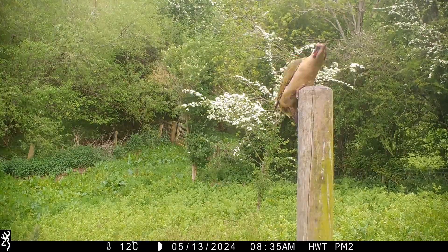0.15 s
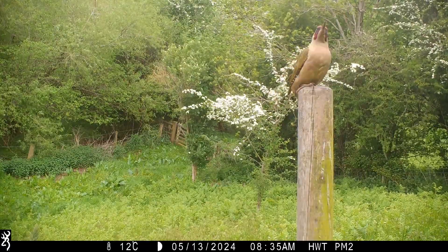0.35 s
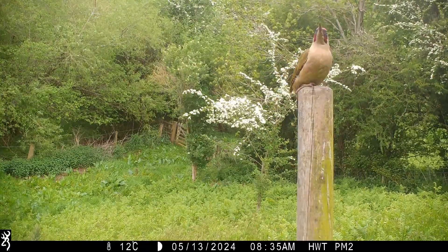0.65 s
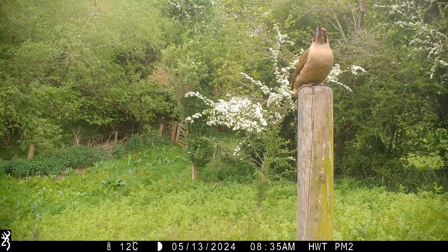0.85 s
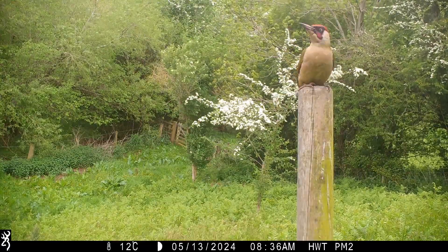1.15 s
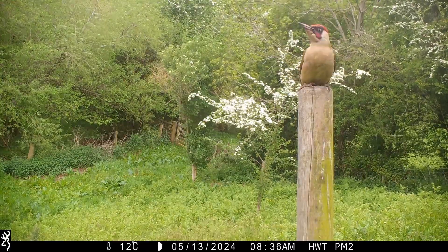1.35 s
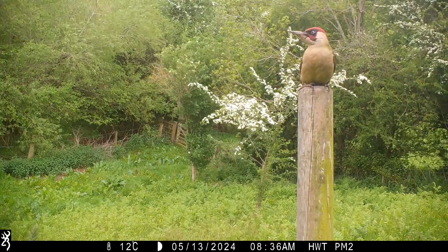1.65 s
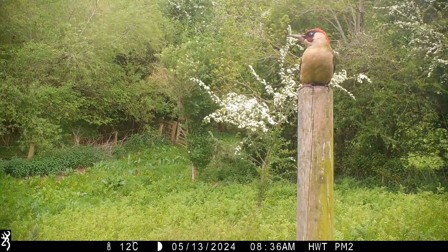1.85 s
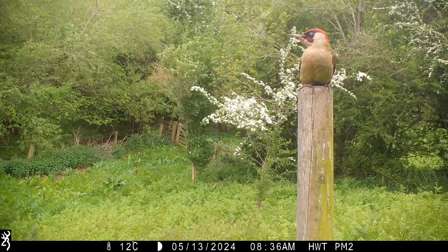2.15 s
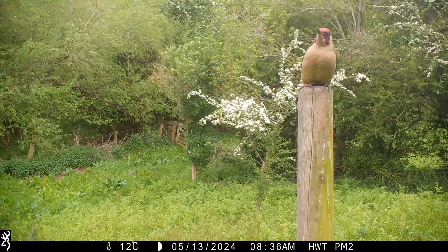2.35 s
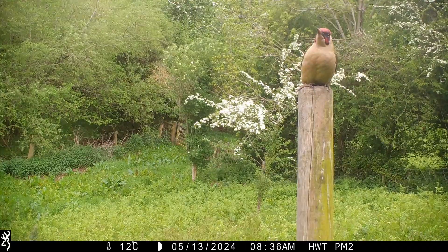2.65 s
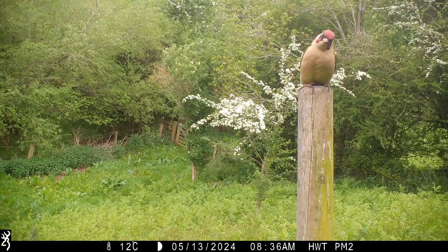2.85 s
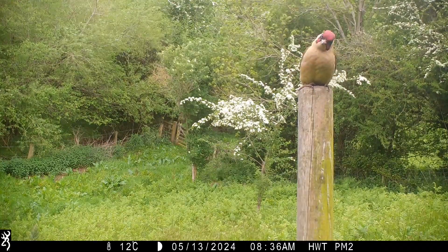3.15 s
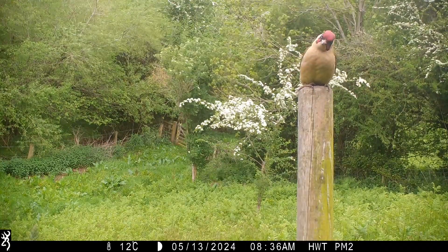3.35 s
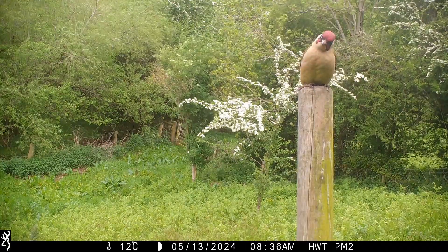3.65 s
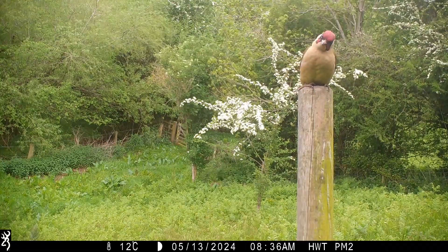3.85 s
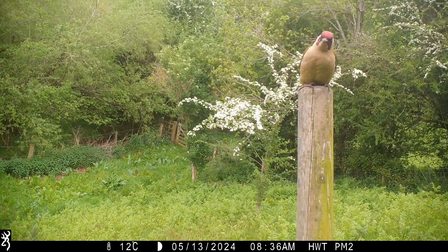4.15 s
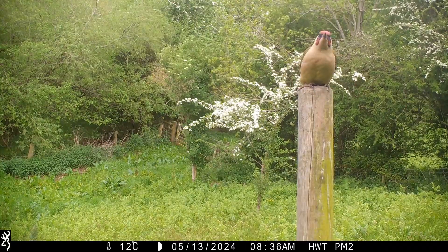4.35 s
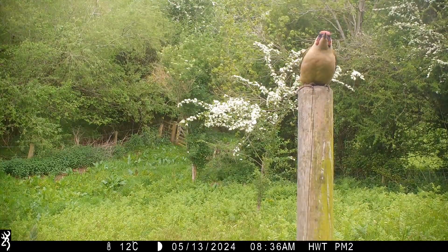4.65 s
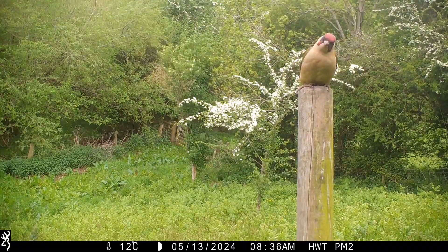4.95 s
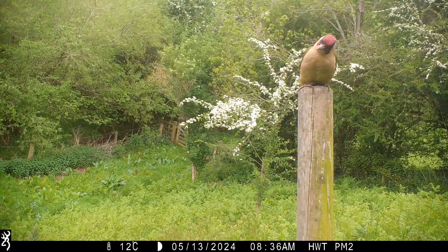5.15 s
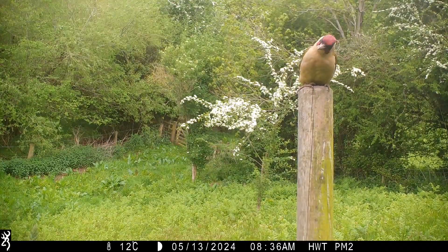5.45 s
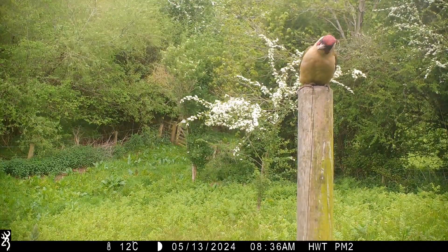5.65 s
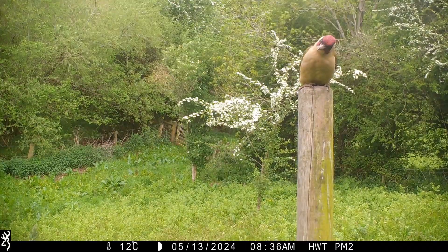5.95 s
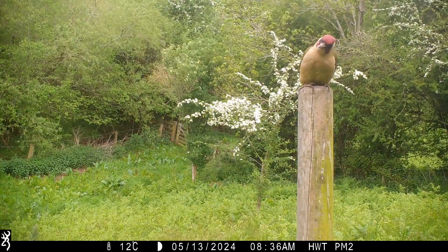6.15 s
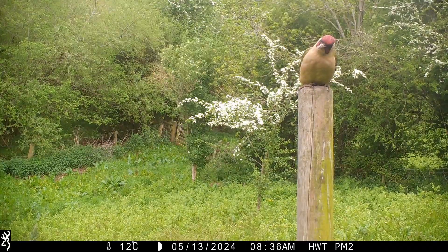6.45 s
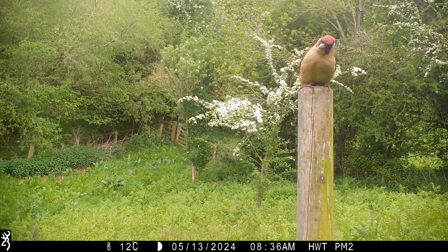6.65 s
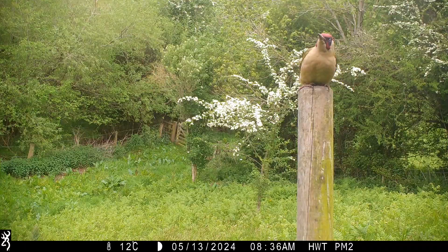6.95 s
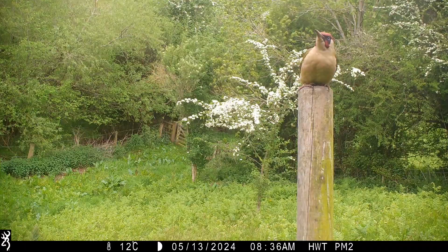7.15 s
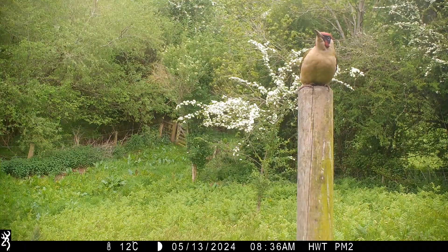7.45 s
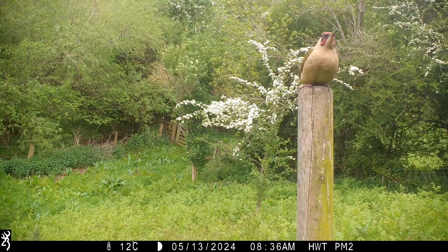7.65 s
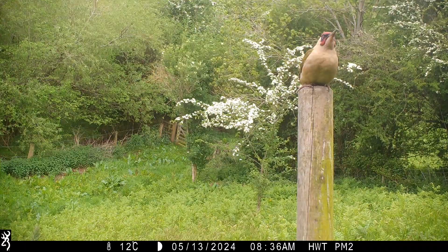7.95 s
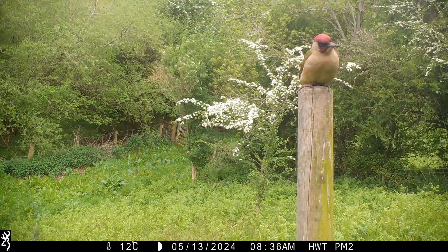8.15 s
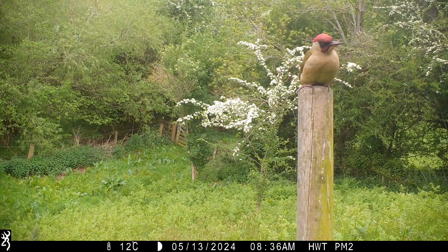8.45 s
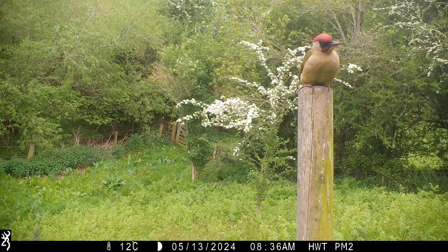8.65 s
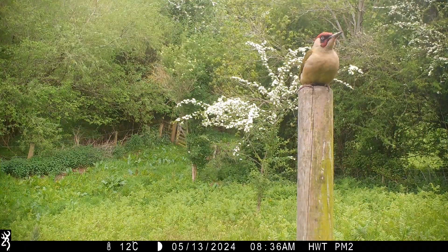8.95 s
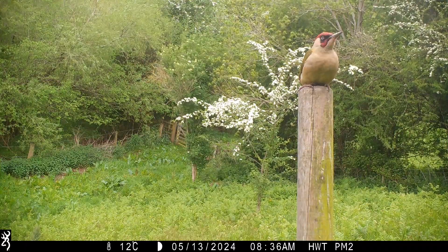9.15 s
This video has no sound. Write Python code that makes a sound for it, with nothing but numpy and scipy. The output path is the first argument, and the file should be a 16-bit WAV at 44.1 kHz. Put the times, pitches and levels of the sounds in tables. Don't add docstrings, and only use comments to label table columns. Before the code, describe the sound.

Over soft distant road hiss, a green woodpecker yelps three loud falling notes close by, then a thrush whistles and trills among faint far birds.

```python
import sys
import numpy as np
from scipy import signal
from scipy.fft import rfft, irfft
from scipy.io import wavfile
from scipy.ndimage import uniform_filter1d, minimum_filter1d

SR = 44100
rng = np.random.default_rng(int(sys.argv[2]) if len(sys.argv) > 2 else 0)


def nominal_scale(level):
    x = np.asarray(level, float) / 20
    return 10 ** x


def wav_record(signal):
    frames = np.transpose(np.atleast_2d(signal))
    bounded = np.clip(frames, -1, 1)
    quanta = np.round(bounded * 32767).astype(np.int16)
    wavfile.write(sys.argv[1], SR, quanta)


N = 410130

# (pitch [Hz], level [dB per Hz])
HISS_COLOUR = [(15, -56.5), (25, -23), (38, -11.5), (110, -12), (313, -5), (349, -3.5), (456, -3.5),
               (740, -1), (1020, -1.5), (1530, -4), (2690, -9.5), (6360, -39), (7890, -41.5), (8550, -44.5),
               (15400, -48)]
# (time [s], level [dB])
HISS_LEVEL = [(0.0, -53.5), (1.5, -53), (2.3, -54), (3.05, -54), (4.2, -54), (9.3, -54.5)]
HUM_HZ, HUM_DB = 50, -79
WHINE_HZ, WHINE_DB, FLIPS_PER_S = 7797.5, -80, 59.3
WHINE_SLIPS = [2.551, 3.12, 3.74, 7.09, 7.761, 8.155]

# (time [s], length [s], start [Hz],
# end [Hz], level [dB])
CHIRPS = [(0.755, 0.06, 2814, 2500, -63), (0.787, 0.094, 4980, 4810, -67), (1.927, 0.094, 5795, 5900, -80),
          (2.07, 0.04, 3882, 3450, -60.5), (2.12, 0.038, 3000, 2980, -55.5),
          (3.003, 0.032, 5080, 4480, -62.5), (3.03, 0.08, 4500, 4020, -60), (3.645, 0.04, 5133, 5562, -73),
          (3.795, 0.06, 3695, 4110, -75), (4.025, 0.11, 6108, 4851, -74.5),
          (7.305, 0.067, 5180, 5520, -84.5), (7.95, 0.08, 3989, 4780, -70.5),
          (8.075, 0.024, 4710, 4650, -77.5), (8.822, 0.03, 5992, 5311, -83.5),
          (8.88, 0.038, 5110, 5430, -78), (8.933, 0.06, 4821, 4560, -74), (9.04, 0.04, 4248, 4080, -72),
          (9.135, 0.04, 3278, 2710, -66), (9.145, 0.19, 4284, 3969, -74.5),
          (0.448, 0.45, 1390, 1310, -62.5), (0.799, 0.23, 1910, 2030, -60.5), (2.96, .115, 1297, 1372, -58),
          (3.065, .3, 1372, 1292, -58),
          (.37, 0.064, 3260, 3270, -69), (1.843, .04, 3560, 3580, -65), (1.919, 0.037, 4170, 3300, -61),
           (1.985, 0.017, 3893, 4600, -61), (2.09, .05, 3470, 3430, -63), (2.229, .03, 4600, 3850, -63),
           (2.32, .07, 4450, 4100, -67.5), (2.282, .08, 2920, 2640, -68.5), (2.4, 0.062, 4200, 4200, -71),
           (2.455, 0.035, 2600, 3950, -66), (2.495, .04, 3950, 2420, -65), (2.486, .07, 4280, 4100, -66),
           (2.727, 0.038, 3010, 3000, -69), (6.78, 0.079, 5150, 5020, -81), (7.452, .04, 1770, 1670, -60),
           (9.201, 0.065, 2950, 3240, -69)]
# (time [s], length [s], level [dB])
COOS = [
    (0.142, 0.2, -62.5),
    (0.612, 0.28, -63),
    (1.85, 0.2, -59.5),
    (2.599, 0.15, -59.5),
]
# (start [Hz], middle [Hz], end [Hz])
COO_PITCH = (400, 428, 405)
# (time [s], level [dB])
RUN = [(4.188, -63), (4.283, -62.5), (4.373, -65), (4.463, -67), (4.553, -67), (4.648, -65), (4.743, -61.5),
       (4.838, -65)]
# (length [s], start [Hz], middle [Hz], end [Hz])
RUN_NOTE = (0.032, 5250, 4450, 4340)
# (time [s], level [dB])
STROKES = [(2.116, -61), (2.248, -63), (2.368, -62), (2.5, -64), (2.628, -67)]
# (length [s], start [Hz], middle [Hz], end [Hz])
STROKE_NOTE = (.05, 5500, 4350, 3200)
BEND = .55
HIGH_LOSS_DB_PER_KHZ = 8.5

# (time [s], peak level [dB], pitch [Hz])
TICKS = [
    (.213, -42, 2500),
    (.319, -43, 4000),
    (1.096, -28, 1850),
    (1.267, -21, 1900),
    (1.466, -24, 1915),
]

# (time [s], pitch [Hz], level [dB])
SLUR = [(4.17, 3005, -61), (4.2, 2458, -47), (4.215, 2060, -59), (4.29, 2103, -58.5), (4.34, 2550, -45),
        (4.38, 2796, -38.5), (4.392, 2735, -68)]
# (time [s], length [s], start [Hz], end [Hz], level [dB])
ASIDES = [(4.295, .055, 3050, 3700, -55), (5.03, 0.043, 3500, 4250, -65.5), (4.455, .024, 2800, 2430, -45),
          (4.46, 0.022, 3700, 3000, -46), (7.255, .03, 2880, 3100, -53.5), (4.716, .036, 2052, 2757, -44.5),
          (4.754, .024, 2370, 2600, -42), (7.42, .058, 3180, 4240, -61.5)]
# (share of length [0-1], pitch [Hz], level [dB])
CHIP_SHAPE = [(0, 2040, -4), (.3, 2556, -7.5), (.5, 2650, 2.5), (.72, 2370, -3.5), (1, 2260, 0)]
# (share of length [0-1], pitch [Hz], level [dB])
PIPE_SHAPE = [(0, 2130, -13), (.1, 2650, -7), (.17, 3030, -0.5), (.42, 3140, -3), (.66, 3097, 2),
              (.75, 2540, -2.5), (.86, 2390, 0.5), (1, 2400, -16)]
# (time [s], length [s], level [dB])
CHIPS = [
    (5.208, .058, -43),
    (5.775, .052, -43),
]
# (time [s], length [s], level [dB])
PIPES = [
    (4.84, 0.16, -44.5),
    (5.343, .15, -41.5),
    (5.905, .15, -44),
]
# (time [s], length [s], level [dB], start [Hz], drop time [s])
DRAWLS = [
    (6.412, 0.2, -46, 2995, .05),
    (7.285, .18, -49.5, 3300, .022),
]
DRAWL_HZ, DRAWL_SAG_HZ = 2650, 69.5
DRAWL_SWELL = 0.51
DRAWL_SWING_HZ, DRAWL_PER_S = 60, 40
# (time [s], length [s], level [dB], swing [Hz], swings [per s])
TRILLS = [
    (6.706, 0.15, -45, 211, 38),
    (7.525, .16, -45.5, 190, 39.5),
]
# (time after start [s], pitch [Hz], level [dB])
FLICK = [
    (0, 2812, -16),
    (.019, 3230, -0.5),
    (.036, 2745, -3.5),
    (.09, 2627, 0.5),
]
TRILL_END_HZ, TRILL_END_DB, TRILL_END_SWING = 2610, -7, .3
TRILL_TAIL_S, TRILL_TAIL_DB, TRILL_DROP_DB = .1, -21, -14.5
OVERTONE_SLOPE, OVERTONE_HZ, OVERTONE_DB = 1.6, 2040, -42.5

# (time [s], pitch [Hz], effort [dB])
YELPS = [
    [(1.094, 770, -49.5), (1.101, 880, -17.5), (1.113, 1363, -4.5), (1.126, 1490, -3), (1.142, 1382, -6.5),
     (1.168, 1210, -6), (1.182, 1041, -13.5), (1.198, 1000, -17), (1.209, 778, -46)],
    [(1.273, 1182, -43.5), (1.28, 1306, -1), (1.293, 1493, -4.5), (1.305, 1420, -3), (1.311, 1352, -8),
     (1.337, 1170, -6.5), (1.353, 1013, -16), (1.370, 830, -20.5), (1.382, 676, -49.5)],
    [(1.465, 933, -50.5), (1.475, 1090, -21), (1.481, 1330, -4.5), (1.492, 1485, -3), (1.504, 1426, -4.5),
     (1.510, 1325, -8), (1.532, 1128, -9), (1.555, 988, -19), (1.572, 683, -41.5)],
]
# (time [s], length [s], rasp level [dB])
CATCHES = [(1.116, .008, -12.5), (1.179, .018, -14.5), (1.209, .01, -21.5), (1.28, .006, -6.5),
           (1.356, .018, -23), (1.363, .01, -26), (1.484, .007, -11), (1.547, .02, -13), (1.564, .01, -33)]
# (pitch [Hz], level [dB])
THROAT = [(900, -17), (1450, -8), (2350, 0.5), (2720, -4.5), (2950, 1), (4150, -25), (4600, -9),
          (5800, -21)]
THIRD_DB, FOURTH_DB, UPPER_STEP_DB = -4.5, -11, -6
BREATH_DB = -33
SAG_RASP_DB, SAG_FROM_HZ, SAG_SPAN_HZ = -15, 1260, 220
WOBBLE = .007

# (delay [s], level [dB])
FOLIAGE = [
    (.007, -11),
    (.014, -8.5),
    (0.027, -21.5),
    (.052, -16.5),
]
WOOD_T60_S, NEAR_WET_DB, FAR_WET_DB = .7, -32.5, -14

# (low edge [Hz], high edge [Hz], above [dB], below [dB])
EMPTIED_BANDS = [(5213, 5900, -43, -25.5), (5900, 6350, -43.5, -33.5), (6350, 6850, -43.5, -23),
                 (7400, 8140, -24, 0)]
OVERLOAD, LOPSIDED, LEFT_DUCK_DB = 0.49, 1, -1.4
PORT_HZ, THUMP_DB, GRIT_DB = 2600, -29, -7
FIZZ_DB, FIZZ_DB_PER_KHZ = -46.5, -1.52


def in_time(rows):
    s, *columns = np.transpose(rows)
    at = np.arange(int(s[0] * SR), min(int(s[-1] * SR), N))
    return at, [np.interp(at / SR, s, c) for c in columns]


def on_pitch_scale(hz, rows):
    curve_hz, curve_db = np.transpose(rows)
    return np.interp(np.log(hz), np.log(curve_hz), curve_db)


def drift(count, hz):
    r = np.exp(-2 * np.pi * hz / SR)
    slow = signal.lfilter([1], [1, -2 * r, r * r], rng.standard_normal(count + 8000))[2000:]
    return slow[6000:] / np.sqrt(np.mean(slow ** 2))


def smooth(x, seconds):
    return uniform_filter1d(x, size=max(int(seconds * SR), 1), mode="nearest")


def fade(count, seconds):
    i = np.arange(count)
    return np.clip(np.minimum(i, count - 1 - i) / (seconds * SR), 0, 1)


def passed(x, hz, kind, order=4):
    return signal.sosfilt(signal.butter(order, hz, kind, fs=SR, output="sos"), x)


def whistle(hz, db):
    return np.sqrt(2) * nominal_scale(db) * np.sin(2 * np.pi * (np.cumsum(hz) / SR + rng.random()))


def flutter(at, hz, db, swing, beats):
    hz = smooth(hz, 0.0098) + swing * np.cos(2 * np.pi * beats + 0.43) + 40 * drift(len(at), 186)
    return whistle(hz, db + 2.1 * drift(len(at), 57)) * fade(len(at), .004)


def glides(rows):
    return [(s, length, start, start + BEND * (end - start), end, db) for s, length, start, end, db in rows]


def hiss():
    hz = np.maximum(np.arange(N // 2 + 1) * SR / N, 1)
    noise = irfft(rfft(rng.standard_normal(N)) * nominal_scale(on_pitch_scale(hz, HISS_COLOUR)), N)
    level = np.interp(np.arange(N) / SR, *np.transpose(HISS_LEVEL)) + 0.75 + 0.9 * drift(N, 2.1)
    return nominal_scale(level) * noise / noise.std() + whistle(np.full(N, HUM_HZ), HUM_DB)


def whine():
    t = np.arange(N) / SR
    slips = sum(np.exp(-((t - s) / 0.0061) ** 4) * 450 * np.sin(2 * np.pi * 35 * (t - s)) for s in WHINE_SLIPS)
    return whistle(WHINE_HZ + slips, WHINE_DB) * np.sign(np.sin(np.pi * FLIPS_PER_S * (t - .0100)))


def far_birds():
    out = np.zeros(N)
    notes = glides(CHIRPS) + [(s, length, *COO_PITCH, db) for s, length, db in COOS]
    notes += [(s, *RUN_NOTE, db) for s, db in RUN]
    notes += [(s, *STROKE_NOTE, db) for s, db in STROKES]
    for s, length, start, middle, end, db in notes:
        at, (hz, swell) = in_time([(s, start, 0), (s + length / 2, middle, np.pi / 2), (s + length, end, np.pi)])
        hz = smooth(hz, length / 6)
        level = db - HIGH_LOSS_DB_PER_KHZ * (hz - middle) / 1000 + 2.4 * drift(len(at), 90)
        out[at] += whistle(hz, level) * np.sin(swell) ** 0.37
    return out


def wood(x):
    t = np.arange(SR) / SR
    tail = rng.standard_normal(SR) * nominal_scale(-60 * t / WOOD_T60_S) * np.clip((t - .006) / 0.013, 0, 1)
    tail = tail + 7.5 * passed(tail, 3200, "high")
    tail = passed(tail, 5200, "low", order=3)
    return signal.fftconvolve(x, tail / np.sqrt(np.sum(tail ** 2)))[:N]


def thrush():
    out = np.zeros(N)
    notes = [SLUR]
    for shape, sung in [(CHIP_SHAPE, CHIPS), (PIPE_SHAPE, PIPES)]:
        for s, length, db in sung:
            notes.append([(s + share * length, hz, db + rel) for share, hz, rel in shape])
    for s, length, start, middle, end, db in glides(ASIDES):
        notes.append([(s, start, db - 12), (s + length / 2, middle, db), (s + length, end, db - 4)])
    for rows in notes:
        at, (hz, db) = in_time(rows)
        hz = smooth(hz, 0.004)
        overtone_hz = OVERTONE_SLOPE * hz + OVERTONE_HZ + 40 * drift(len(at), 200)
        overtone = whistle(overtone_hz, db + OVERTONE_DB)
        out[at] += (whistle(hz, db + 1.7 * drift(len(at), 60)) + overtone) * fade(len(at), 0.0023)

    for s, length, level, start, drop in DRAWLS:
        at, (hz, db) = in_time([(s, start, -11), (s + drop, DRAWL_HZ, -4),
                                (s + DRAWL_SWELL * length, DRAWL_HZ - DRAWL_SAG_HZ / 2, 0),
                                (s + length, DRAWL_HZ - DRAWL_SAG_HZ, -16)])
        db = level + db + 2.0 * drift(len(at), 25)
        out[at] += flutter(at, hz, db, DRAWL_SWING_HZ, DRAWL_PER_S * (at / SR - s))

    top, low, settled = (row[0] for row in FLICK[1:])
    for s, length, level, swing, rate in TRILLS:
        opening = [(s + after, hz, db) for after, hz, db in FLICK]
        ending = [(s + length, TRILL_END_HZ, TRILL_END_DB), (s + length + .015, TRILL_END_HZ, TRILL_DROP_DB),
                  (s + length + TRILL_TAIL_S, TRILL_END_HZ, TRILL_TAIL_DB)]
        at, (hz, db) = in_time(opening + ending)
        after = at / SR - s
        depth = np.interp(after, [top, low, settled, length, length + .015], [0, 1, .8, TRILL_END_SWING, 0])
        out[at] += flutter(at, hz, level + db, swing * depth, rate * (after - top))
    return out


def ticks():
    out, t = np.zeros(N), np.arange(500) / SR
    for s, db, hz in TICKS:
        noise = rng.standard_normal(500)
        click = passed(noise * np.exp(-t / 0.0018), [hz * 0.72, hz * 1.3], "band", order=2)
        start = round(s * SR)
        out[start:start + 500] += nominal_scale(db) * click / np.abs(click).max()
    return out


def woodpecker():
    out, t = np.zeros(N), np.arange(N) / SR
    catch = nominal_scale(BREATH_DB) + sum(nominal_scale(db) * np.exp(-(2 * (t - s) / length) ** 2) for s, length, db in CATCHES)
    for rows in YELPS:
        at, (hz, db) = in_time(rows)
        hz = smooth(hz, .006)
        first, second, third, *upper = (on_pitch_scale(k * hz, THROAT) for k in range(1, 7))
        falling = at > at[hz.argmax()]
        sag = nominal_scale(SAG_RASP_DB) * np.clip((SAG_FROM_HZ - hz) / SAG_SPAN_HZ, 0, 1) * falling
        shake = passed(rng.standard_normal((2, len(at))), 800, "low") * 5 * (catch[at] + sag)
        turn = 2 * np.pi * np.cumsum(hz * (1 + WOBBLE * drift(len(at), 170))) / SR + .5 * shake[0]
        voice = nominal_scale(first) * np.cos(turn + .3) - nominal_scale(second) * np.cos(2 * turn)
        voice += nominal_scale(third + THIRD_DB) * np.cos(3 * turn)
        for k, colour in enumerate(upper):
            level = nominal_scale(colour + FOURTH_DB + UPPER_STEP_DB * k)
            voice += level * np.cos((4 + k) * turn + 2.5 * shake[1])
        effort = 1.338 * nominal_scale(smooth(db, 0.0027))
        out[at] += effort * voice * (1 + shake[1]) * fade(len(at), .002)
    return signal.sosfiltfilt(signal.butter(2, 5600, fs=SR, output="sos"), out)


def scene():
    near, song = woodpecker() + ticks(), thrush()
    far = song + far_birds()
    hedge = sum(nominal_scale(db) * np.roll(song, int(s * SR)) for s, db in FOLIAGE)
    scattered = wood(nominal_scale(NEAR_WET_DB) * passed(near, 3600, "low", order=3) + nominal_scale(FAR_WET_DB) * far)
    air = near + far + hedge + scattered + hiss() + whine()
    return np.array([air, air])


def lose_faint_highs(x):
    level = 20 * np.log10(smooth(np.abs(passed(x, [2000, 3600], "band")), .03) + 1e-9) + 2.5
    hz, spectrum = np.arange(N // 2 + 1) * SR / N, rfft(x)
    top_edges = np.arange(8140, 15800, 450)
    bands = [(*row, 1) for row in EMPTIED_BANDS]
    bands += [(low, high, -51, -27, 5) for low, high in zip(top_edges, top_edges[1:])]
    for low_hz, high_hz, above_db, below_db, chance_db in bands:
        shifted = level + chance_db * drift(N, 8)
        gate = smooth(1. * (shifted > above_db) * (shifted < below_db), .006)
        x = x - .95 * gate * irfft(spectrum * (hz >= low_hz) * (hz < high_hz), N)
    return x


def streaks():
    out, white = 0, rng.standard_normal(N)
    for hz in np.linspace(4000, 14700, 24) + rng.uniform(-150, 150, 24):
        level = nominal_scale(7.0 * drift(N, 6) + FIZZ_DB_PER_KHZ * (hz / 1000 - 4))
        out = out + level * passed(white, [hz - 90, hz + 90], "band", order=2)
    return 8 * out


def low_pass(x):
    return signal.sosfilt(signal.butter(12, 15600, fs=SR, output="sos"), x)


def record(dry):
    sound = lose_faint_highs(dry[0])
    room = smooth(minimum_filter1d(.83 / np.maximum(np.abs(sound), .83), size=90), .002)
    held = sound * room
    drive = passed(sound, PORT_HZ, "high", order=3) + .25 * sound
    drive = drive + 0.31 * passed(sound, [1250, 1600], "band", order=2)
    excess = drive - np.clip(drive, -LOPSIDED * OVERLOAD, OVERLOAD)
    over = np.clip(smooth(np.abs(excess), .003) / 0.0049, 0, 1)
    thump = over * (passed(rng.standard_normal(N), 370, "low", order=2) * 6.33 - .6)
    thump = passed(thump, 12, "high", order=1)
    grit = passed(excess * (1 + 0.33 * drift(N, 300)), [5000, 12000], "band", order=2)
    fizz = np.abs(smooth(over, 0.024)) ** .5 * streaks()
    sound = held - nominal_scale(GRIT_DB) * grit + nominal_scale(FIZZ_DB) * fizz + nominal_scale(THUMP_DB) * thump
    loud = smooth(np.clip(smooth(np.abs(sound), 0.018) / 0.029 - 1, 0, 1), .012)
    pair = sound * nominal_scale(np.outer([.5, -.5], LEFT_DUCK_DB * loud))
    return low_pass(pair)


dry = scene()
out = record(dry)
wav_record(out)
```